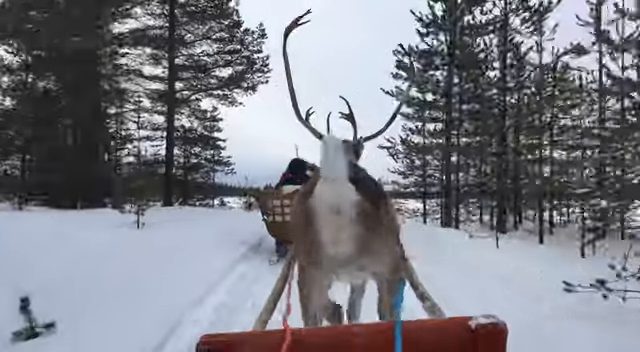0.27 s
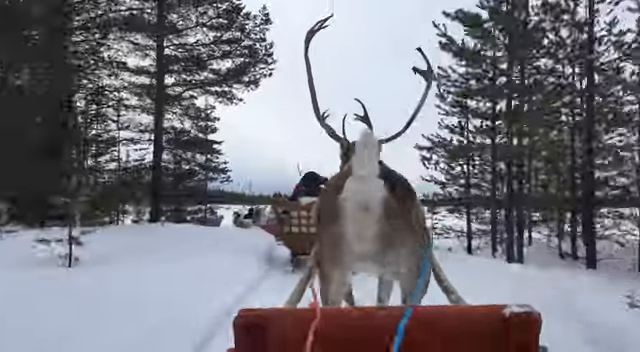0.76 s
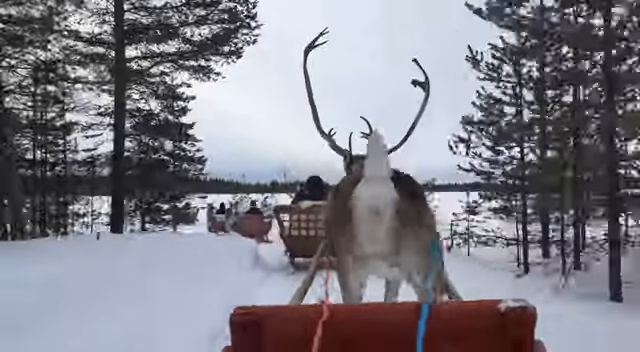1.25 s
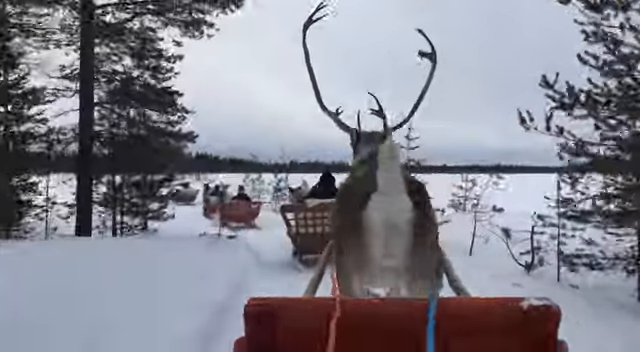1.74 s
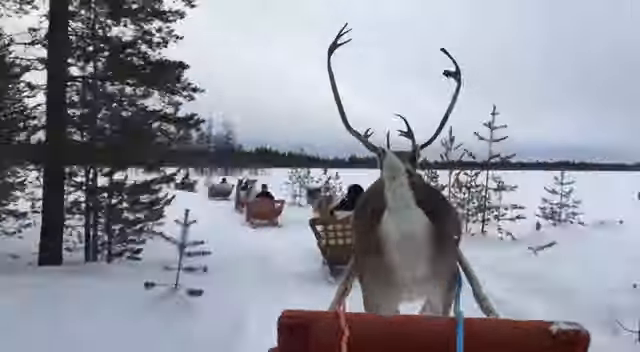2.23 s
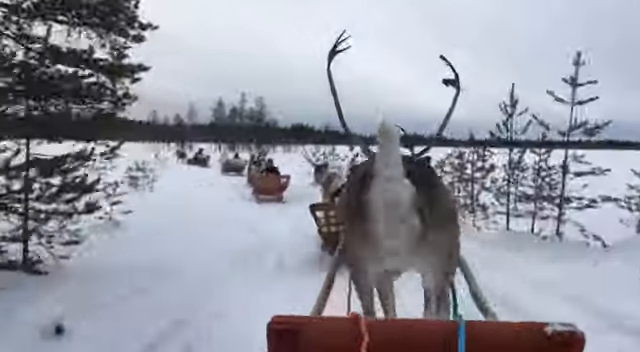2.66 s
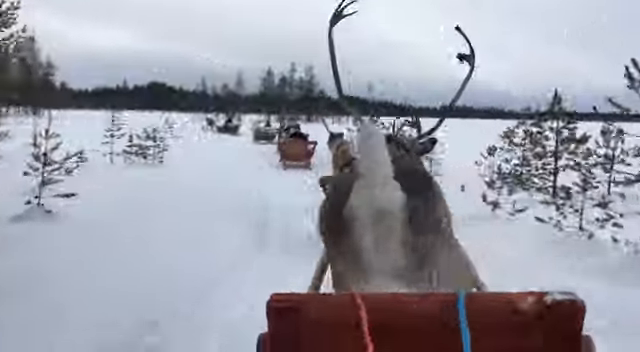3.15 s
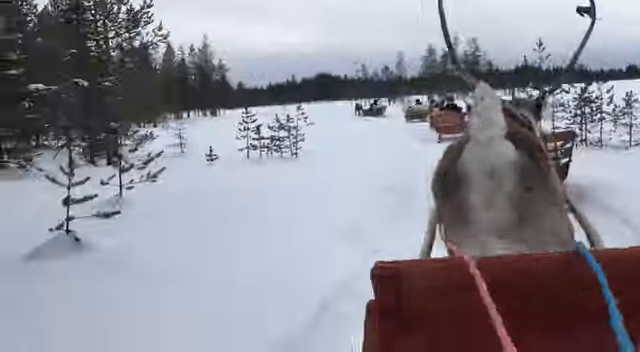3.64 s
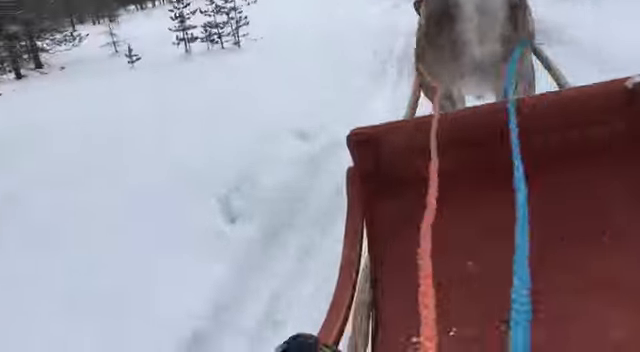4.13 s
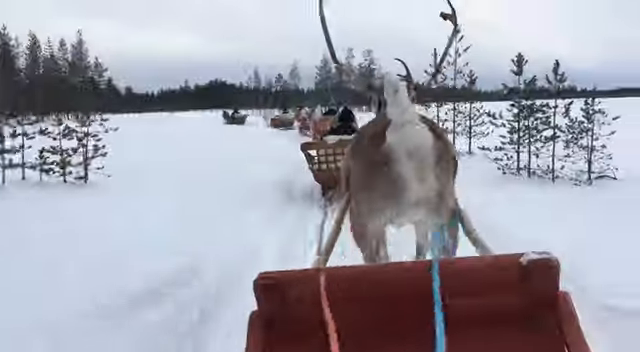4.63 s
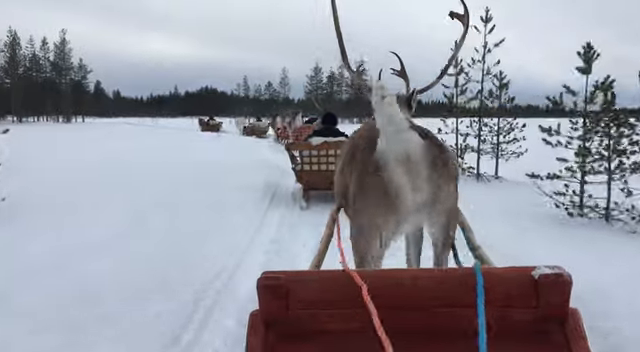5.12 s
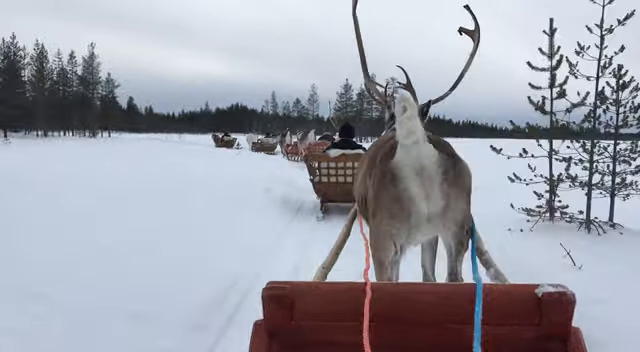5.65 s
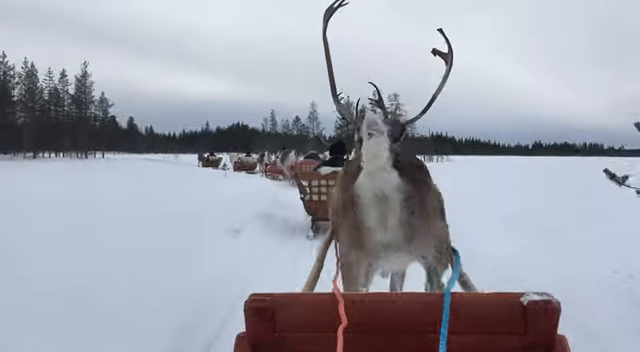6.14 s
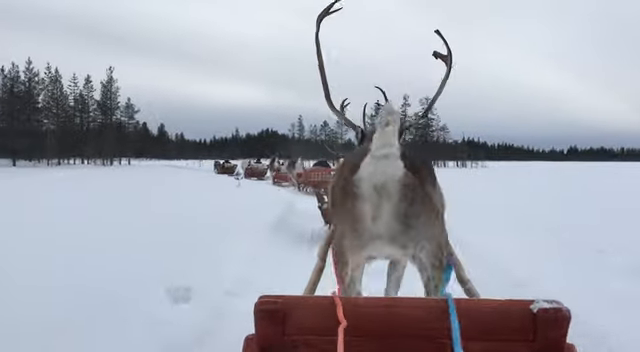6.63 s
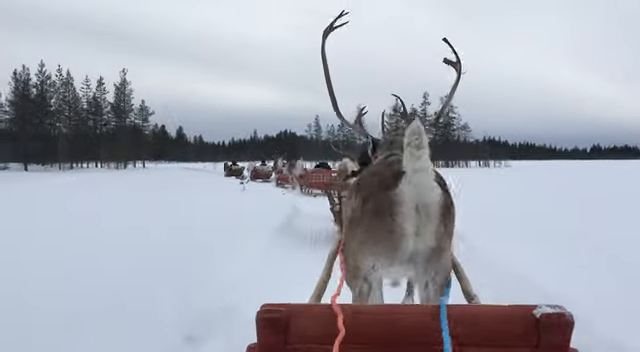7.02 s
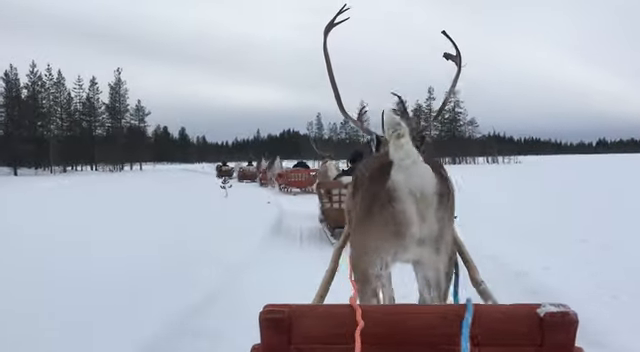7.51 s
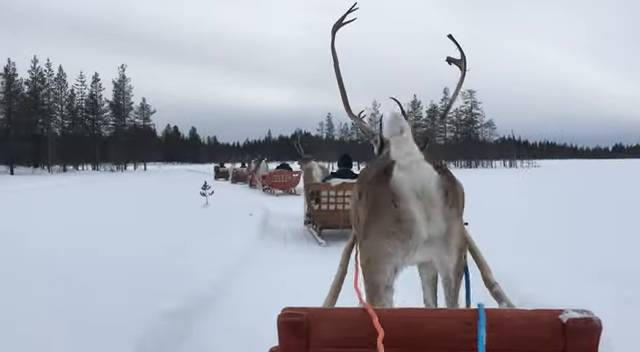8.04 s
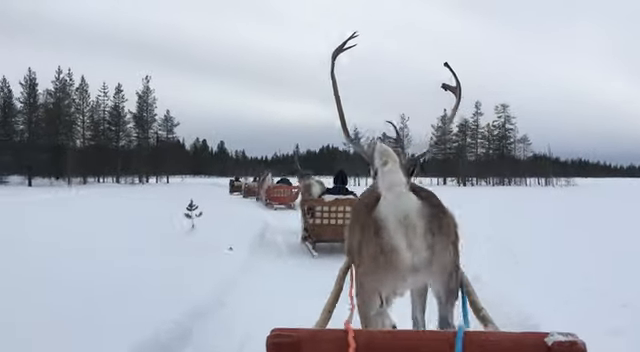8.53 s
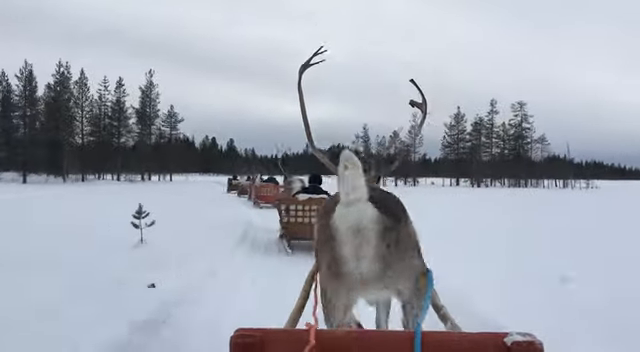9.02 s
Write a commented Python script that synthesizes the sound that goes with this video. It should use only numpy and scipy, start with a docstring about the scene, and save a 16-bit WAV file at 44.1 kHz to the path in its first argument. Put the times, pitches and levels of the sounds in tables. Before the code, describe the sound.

Low, uneven rumble of a reindeer sleigh gliding on snow, dotted with wooden knocks, harness ticks and brief crunches.

```python
"""A reindeer sleigh on packed snow.

Heard from the seat: friction at the runners drives the hollow wooden body into a rumble that swells over
hummocks. Impacts excite damped modes: ruts and, later, footfalls thump the body, the shafts knock in their
joints, fittings tick and a harness ring jingles. Crust crunches as it fractures, and dull blows disperse into
thuds. Stick-slip gives a groan and, after one jolt, a shrill scrape. There are a few squeaks and a very brief
high whistle. Under it all lie a thin hiss and faint bursts of snow kicked up by the hooves."""
import sys
import numpy as np
from scipy import signal
from scipy.fft import rfft, irfft, next_fast_len
from scipy.io import wavfile
from scipy.ndimage import uniform_filter1d, map_coordinates

SR = 44100
rng = np.random.default_rng(int(sys.argv[2]) if len(sys.argv) > 2 else 0)


def persist_wave(psi):
    """Save psi, clipped to +-1, as 16-bit WAV."""
    counts = np.round(np.clip(psi, -1, 1) * 32767).astype(np.int16)
    wavfile.write(sys.argv[1], SR, np.atleast_2d(counts).T)


N = 408807

# the snow under the runners: time_s, friction_db, hiss_db
SNOW_LEVELS = [(0.0, -44.5, -56.5), (0.33, -41.5, -54), (0.85, -50, -55), (2.45, -49, -52.5),
               (2.66, -42.5, -50.5), (2.91, -44.5, -56.5), (3.12, -42, -48.5), (4.0, -48, -51.5),
               (4.46, -47, -54.5), (4.65, -50, -53.5), (5.55, -46, -53.5), (5.99, -52.5, -53.5),
               (6.38, -45, -57), (6.53, -51, -54.5), (8.72, -48.5, -54.5), (9.27, -48.5, -53.5)]
# spectrum of a thin hiss: frequency_hz, level_db
HISS_SPECTRUM = [(1500, 4), (3600, 3), (4800, -4), (5300, -1.5), (6300, 1.5), (7800, -4.5), (9400, -0.5),
                 (10500, -3), (12600, 5.5), (14000, 0.5), (16000, 1)]


def amp(db):
    """Decibels to amplitude gain."""
    return 10 ** (np.asarray(db) / 20)


def unit(x):
    """x scaled to rms 1."""
    return x / np.sqrt(np.mean(x ** 2) + 1e-20)


def curves(rows):
    """Linear interpolation: one value per sample for each column after the time."""
    times, *columns = np.transpose(rows)
    return [np.interp(np.arange(N) / SR, times, column) for column in columns]


def wobble(rate_hz):
    """Random modulation: a smooth curve through rate_hz Gaussian knots a second."""
    knots = rng.standard_normal(int(N * rate_hz / SR) + 4)
    return map_coordinates(knots, [np.arange(N) * rate_hz / SR])


def noise(samples=N):
    """White Gaussian noise."""
    return rng.standard_normal(samples)


def grains(rate_hz, spread_db):
    """Shot noise: tiny fractures at random times and of uneven size, at rms 1."""
    impulses = (rng.random(N) < rate_hz / SR) * np.sign(noise())
    return unit(impulses * amp(spread_db * np.clip(noise(), -2, 2)))


def filtered(x, response):
    """Linear filtering: the spectrum of x times a response of frequency."""
    size = next_fast_len(len(x) + 8192)
    return irfft(rfft(x, size) * response(np.fft.rfftfreq(size, 1 / SR)), size)[:len(x)]


def coloured(x, spectrum):
    """Spectral shaping of x by (frequency_hz, level_db) points, at rms 1."""
    points_hz, db = np.transpose(spectrum)
    return unit(filtered(x, lambda hz: amp(np.interp(np.log(hz + 1), np.log(points_hz), db))))


def resonant(x, modes):
    """Forced vibration: x drives (frequency_hz, bandwidth_hz, gain_db) resonators, at rms 1."""
    def response(f):
        return sum(amp(db) * 1j * f * width / (hz * hz - f * f + 1j * f * width)
                   for hz, width, db in modes)
    return unit(filtered(x, response))


def ring(modes, t, scatter_db):
    """Free vibration: (frequency_hz, level_db, t60_s) modes decay from random strengths and phases."""
    hz, db, t60 = np.transpose(modes)[:, :, None]
    level = db + scatter_db * rng.standard_normal(hz.shape) - 60 * t / t60
    return np.sum(amp(level) * np.sin(2 * np.pi * (hz * t + rng.random(hz.shape))), axis=0)


def emphasis(hz, note_hz, gain_db, octaves):
    """Decibels that a broad resonance adds around its note."""
    return gain_db * np.exp(-(np.log2(hz / note_hz) / octaves) ** 2)


def burst(length_s, rise_s):
    """A transient force: exponential rise, Gaussian fade."""
    t = np.arange(SR // 3) / SR
    return (1 - np.exp(-t / rise_s)) * np.exp(-(t / length_s) ** 2)


def add(track, start_s, db, sound):
    """Superposition: add a sound to the track at start_s with a gain of db."""
    part = track[max(round(start_s * SR), 0):][:len(sound)]
    part += amp(db) * sound[:len(part)]


def hummocks():
    """Amplitude modulation by load: the gains of rumble and shudder swell to each crest and ebb."""
    # hummocks under the runners: crest_s, half_length_s, rumble_db, shudder_db
    crests = [(0.091, 0.035, -26.5, -24.5), (0.418, 0.061, -20.5, -22.5), (0.616, 0.02, -18, -16.5),
              (0.844, 0.053, -15.5, -34), (1.31, 0.075, -23, -23), (2.296, 0.041, -36, -24),
              (2.527, 0.036, -25.5, -27), (2.945, 0.032, -20.5, -37), (3.097, 0.086, -24, -45),
              (3.275, 0.042, -15, -19), (3.397, 0.082, -25.5, -45), (3.697, 0.094, -19.5, -28),
              (4.264, 0.031, -25, -49), (4.494, 0.12, -17.5, -30), (5.582, 0.045, -25.5, -46),
              (6.327, 0.025, -24, -53), (6.826, 0.022, -31, -28), (7.344, 0.055, -26, -46),
              (7.74, 0.05, -26, -52), (7.917, 0.04, -23, -31.5), (8.462, 0.028, -23.5, -42),
              (8.599, 0.03, -21.5, -28), (8.69, 0.035, -22, -44), (8.936, 0.018, -17, -31)]
    t, heave, sway = np.arange(N) / SR, np.zeros(N), np.zeros(N)
    for crest, half, rumble_db, shudder_db in crests:
        load = np.exp(-((t - crest) / half) ** 2)
        heave += amp(rumble_db) * load
        sway += amp(shudder_db) * load
    return heave, sway


def runners(body_gain_db=0.53, deep_gain_db=3.0, friction_gain_db=-0.5, lumps_db=2.5, grip_db=3.5):
    """Forced vibration: drag, hummocks and lumps shake the body as snow grains break under it."""
    # the steady drag of the runners: time_s, rumble_db, shudder_db
    drag = [(0.0, -29, -46), (0.2, -27.5, -41), (0.75, -28.5, -35.5), (1.11, -38, -47), (1.47, -30.5, -31),
            (2.43, -38, -39.5), (2.68, -28.5, -31), (2.97, -32.5, -42), (5.0, -30.5, -42.5),
            (6.48, -31, -45.5), (7.0, -35.5, -35.5), (7.69, -34, -44.5), (8.05, -34.5, -37),
            (8.83, -33.5, -46), (9.27, -27.5, -36)]
    # spectrum of the rumbling body: frequency_hz, level_db
    rumble_spectrum = [(60, -60), (105, -7), (140, -2.5), (175, 0), (225, -6.5), (275, -9), (310, -13.5),
                       (380, -10), (445, -25), (600, -45), (1500, -73)]
    # spectrum of the body under heavy load, mostly its lowest mode: frequency_hz, level_db
    loaded_spectrum = [(60, -45), (105, -12), (145, 0), (180, -1.5), (225, -8.5), (340, -14.5),
                       (450, -30.5), (1200, -65)]
    # spectrum of the deep shudder: frequency_hz, level_db
    shudder_spectrum = [(15, -58), (27, -37), (42, -11.5), (60, -6), (80, -9.5), (110, -10.5), (200, -53),
                        (500, -85)]
    # spectrum of friction on snow: frequency_hz, level_db
    friction_spectrum = [(200, -4.5), (450, 1.5), (680, 7), (900, 0), (1300, -5), (1700, -7), (2500, -13.5),
                         (3700, -20), (4700, -35), (9000, -19.5), (16000, -39)]
    # timber resonances that colour the friction: frequency_hz, bandwidth_hz, gain_db
    timber_modes = [(596, 140, -1), (906, 58, 4), (1054, 90, -2), (1326, 34, 3.5), (1680, 44, -14),
                    (2280, 120, -8), (2490, 280, -8)]
    body_db, deep_db = curves(drag)
    friction_db, _ = curves(SNOW_LEVELS)
    heave, sway = hummocks()
    lumps = wobble(28)
    body_force = amp(body_db + body_gain_db + lumps_db * lumps)
    deep_force = amp(deep_db + deep_gain_db + lumps_db * lumps)
    rumble = body_force * coloured(grains(600, spread_db=1.5), rumble_spectrum)
    boom = heave * coloured(grains(600, spread_db=2.0), loaded_spectrum)
    shudder = np.hypot(deep_force, sway) * coloured(noise(), shudder_spectrum)  # powers add
    snow = coloured(grains(3000, spread_db=1.5), friction_spectrum)
    timber = 0.35 * resonant(grains(1500, spread_db=8.0), timber_modes)
    grip = 0.5 * (lumps + wobble(12) + wobble(70))  # the snow holds unevenly at several rates
    friction = amp(friction_db + friction_gain_db + grip_db * grip) * (snow + timber)
    return rumble + boom + shudder + friction


def hiss(gain_db=3.5, flutter_db=1.8, patchiness_db=3.0):
    """Modulated noise: a thin, dry hiss, gently patchy in time and frequency, swelling in loose snow."""
    _, hiss_db = curves(SNOW_LEVELS)
    spectra = signal.stft(noise(), nperseg=512)[2]
    patches = uniform_filter1d(rng.standard_normal(spectra.shape), size=5, axis=0)
    patches = uniform_filter1d(patches, size=5, axis=1)
    fizz = signal.istft(spectra * amp(patchiness_db * unit(patches)), nperseg=512)[1][:N]
    return amp(hiss_db + gain_db + flutter_db * wobble(18)) * coloured(fizz, HISS_SPECTRUM)


def hooves(level_db=-47.0, step_s=0.145, t60_s=0.12, rise_s=0.0047, uneven_db=4):
    """Decaying shot noise: trotting hooves kick up faint, crisp bursts of snow at an uneven pace."""
    # spectrum of kicked snow: frequency_hz, level_db
    kicked_spectrum = [(500, -8), (2500, 0), (6000, 6), (9000, 11), (16000, 3)]
    force, t = np.zeros(N), np.arange(SR // 6) / SR
    kick = (1 - np.exp(-t / rise_s)) * amp(-60 * t / t60_s)
    for step, (late, size) in enumerate(rng.uniform(-1.19, 1, (int(N / SR / step_s), 2))):
        add(force, (step + 0.5 + 0.5 * late) * step_s, level_db + uneven_db * size, kick)
    return force * coloured(grains(2000, spread_db=6.0), kicked_spectrum)


def bumps(gain_db=-1.0, rise_s=0.0025, lag_s=0.00094):
    """Impulse response: each rut or footfall sets the low modes of the hollow body ringing in a soft thump."""
    # jolts from ruts and, later, from the reindeer's footfalls: start_s, level_db, pitch_hz
    ruts = [(0.072, -14.5, 101), (0.376, -6, 142.2), (0.582, -14, 133.4), (0.62, -15, 63),
            (0.805, -12, 147), (0.874, -10, 97), (0.916, -10, 124), (0.964, -14, 88.4), (1.282, -20, 121),
            (1.355, -18, 155), (1.957, -9, 143), (2.144, -17, 169.4), (2.571, -10, 121), (2.603, -9, 152),
            (2.943, -17.5, 154), (3.112, -12, 176), (3.23, -3, 153), (3.271, -10, 155), (3.67, -12, 132),
            (3.727, -10.5, 149), (4.348, -11.5, 140), (4.411, -8, 176.6), (4.432, -8, 137),
            (4.472, -6.5, 131), (4.529, -7.5, 140), (4.639, -11.5, 130), (5.138, -20.5, 183),
            (5.7994, -8.5, 140), (6.031, -12, 142), (6.583, -27, 173), (6.682, -25, 204),
            (7.436, -14.5, 175), (7.562, -22.5, 182.5), (8.012, -13.5, 174.4), (8.372, -20, 150),
            (8.441, -12.5, 170), (8.581, -21.5, 158), (9.083, -20.5, 157)]
    # modes of the hollow body: frequency_ratio, level_db, t60_s
    body_modes = [(1.001, 3, 0.12), (1.36, -11, 0.17), (2.049, -7, 0.11), (2.55, -22.5, 0.077)]
    out, t = np.zeros(N), np.arange(SR // 4) / SR
    for start, db, hz in ruts:
        modes = [(hz * ratio, level, t60) for ratio, level, t60 in body_modes]
        thump = ring(modes, t, scatter_db=3.5) * (1 - np.exp(-t / rise_s))
        add(out, start + lag_s, db + gain_db, thump)
    return out


def knocks(gain_db=-9, build_cycles=0.59, rebound_s=0.005045, rebound_db=-4,
           contact_gain=0.75, contact_rise_s=0.00053, contact_t60_s=0.08):
    """Impact with one rebound: wood clacks on wood while the frame's modes build to a hollow note."""
    # the shafts knock in their joints: start_s, level_db, tilt_db_per_octave, joint_note_hz
    impacts = [(0.078, -26.5, -5.5, 513), (0.373, -23.5, 7, 1310), (0.587, -21, -2, 690),
               (0.801, -13, 0.5, 1270), (0.876, -27, -7.5, 480), (0.914, -31, -9.5, 466),
               (1.288, -32, -8.5, 700), (1.357, -21, -6, 1160), (1.952, -10, -1.5, 970),
               (2.155, -36, -6, 400), (2.572, -21.5, -4, 1120), (3.428, -26.5, 0, 970),
               (4.391, -23.5, -4, 1190), (4.468, -23.5, -7, 1200), (4.473, -21.5, -4, 790),
               (4.521, -23.5, -4, 1200), (5.797, -14.5, -2.5, 1060), (6.017, -21, -4, 730),
               (6.819, -33, 4, 1400), (8.916, -34, 2, 1000)]
    # modes of the wooden frame: frequency_hz, level_db, t60_s
    frame_modes = [(342.4, 5, 0.093), (411, -3.5, 0.15), (508, -8.5, 0.087), (585, 0, 0.068),
                   (685, 2, 0.063), (848, -8.5, 0.12), (1000, -2, 0.037), (1150, -3.5, 0.04),
                   (1280, -8.5, 0.043), (1357, -18.5, 0.06), (1610, -10, 0.068), (1884, -18, 0.065),
                   (2160, -21.5, 0.077), (2330, -14.5, 0.06), (2840, -17, 0.03)]
    # spectrum of wood pressing on wood: frequency_hz, level_db
    contact_spectrum = [(70, -47), (250, -15), (450, -12), (1300, 2.5), (1900, -10), (3000, -13.5),
                        (4500, -29), (9000, -33)]
    out, t = np.zeros(N), np.arange(SR // 8) / SR
    pressure = contact_gain * amp(-60 * t / contact_t60_s) * (1 - np.exp(-t / contact_rise_s))
    for start, db, tilt, note in impacts:
        def joint_db(hz):
            return tilt * np.log2(hz / 1000) + emphasis(hz, note, gain_db=6, octaves=0.26)
        clack_spectrum = [(hz, level + joint_db(hz)) for hz, level in contact_spectrum]
        detune = 1 + 0.03 * rng.standard_normal()  # the load on the joint shifts its note
        for delay, drop_db in [(0, 0), (rebound_s, rebound_db)]:
            wood = np.zeros(len(t))
            for hz, level, t60 in frame_modes:
                mode = ring([(hz * detune, level + joint_db(hz), t60)], t, scatter_db=2.5)
                wood += mode * (1 - np.exp(-t * hz / build_cycles))
            clack = pressure * coloured(noise(len(t)), clack_spectrum)
            add(out, start + delay, db + gain_db + drop_db, wood + clack)
    return out


def groan(start_s=0.173, end_s=0.4, fade_s=0.012, pitch_hz=168, level_db=-19, waver=0.024):
    """Stick-slip oscillation: a runner grips and slides in step with the body's lowest mode."""
    t = np.arange(N) / SR
    swell = np.clip(np.minimum(t - start_s, end_s - t) / fade_s, 0, 1)
    envelope = amp(level_db + wobble(31)) * swell
    pitch = pitch_hz * (1 + waver * wobble(27.2))
    return envelope * np.sin(2 * np.pi * np.cumsum(pitch) / SR)


def crunches(gain_db=2, rise_s=0.0014):
    """Brittle fracture: crust gives way in a quick burst of grains that makes the timber creak."""
    # the runners break through crust: start_s, level_db, length_s, snow_fraction
    breaks = [(0.332, -28.5, 0.025, 0.46), (0.369, -40, 0.04, 0), (0.887, -41, 0.042, 0.45),
              (3.039, -37, 0.14, 0.52), (3.108, -36.5, 0.043, 0.33), (3.231, -19.5, 0.019, 0.9),
              (3.246, -24.5, 0.034, 0.5), (3.433, -37.5, 0.03, 0.2), (3.579, -34.5, 0.057, 0.42),
              (3.657, -36.5, 0.05, 0.37), (4.385, -31, 0.04, 0.4), (4.49, -41, 0.039, 0.14),
              (4.813, -42.5, 0.12, 0.3), (6.238, -47, 0.093, 0.43), (6.474, -47.5, 0.041, 0.36),
              (7.218, -40, .018, 0.45), (7.682, -43.5, 0.037, 0.53), (7.995, -42, 0.041, 0.3),
              (8.665, -48, 0.023, 0.4)]
    # spectrum of breaking crust: frequency_hz, level_db
    crust_spectrum = [(200, -29), (500, 8), (1200, 3), (1800, 4), (2500, 5), (3300, -7.5), (4300, -4.5),
                      (5800, -18), (9000, -17.5), (16000, -25)]
    # resonances of the creaking timber: frequency_hz, bandwidth_hz, gain_db
    creak_modes = [(828, 89, 17.5), (1084, 58, 17.5), (1290, 27, 12), (1645, 38, 12), (2140, 41, -5),
                   (2350, 51, 2), (5380, 240, -4.5)]
    on_snow, on_timber = np.zeros(N), np.zeros(N)
    for start, db, length, snow_fraction in breaks:
        force = burst(length, rise_s)
        add(on_snow, start, db + gain_db, snow_fraction * force)
        add(on_timber, start, db + gain_db, (1 - snow_fraction) * force)
    crust = on_snow * coloured(grains(2500, spread_db=5.0), crust_spectrum)
    creak = on_timber * resonant(grains(900, spread_db=2.0), creak_modes)
    return crust + creak


def squeaks(waver=0.0225, roughness=0.4):
    """Modulated tones: three rough squeaks of a fitting, and a very brief, high, wavering whistle."""
    # short tones, the highest being the whistle: middle_s, half_length_s, pitch_hz, level_db
    tones = [(0.347, 0.016, 3150, -39), (2.025, 0.01, 3130, -28), (4.392, .01, 9760, -40),
             (4.403, 0.015, 2470, -35)]
    t, out = np.arange(N) / SR, np.zeros(N)
    warped_time = np.cumsum(1 + waver * wobble(400)) / SR
    for middle, half, hz, db in tones:
        envelope = amp(db) * np.exp(-((t - middle) / half) ** 2)
        out += envelope * np.sin(2 * np.pi * hz * warped_time)
    return out * (1 + roughness * wobble(250))


def ticks(gain_db=-8, snap_t60_s=0.029, ring_db=-10, ring_t60_s=0.045, ring_width_hz=250):
    """Hard contact: a broadband snap centres on the resonance of each fitting, which rings briefly."""
    # harness fittings strike: start_s, level_db, note_hz
    contacts = [(0.599, -20, 9600), (0.725, -28.5, 6160), (0.8, -24, 6240), (1.109, -31.5, 6000),
                (1.3423, -21, 12300), (1.908, -27.5, 12000), (1.955, -19, 13000), (2.602, -20.5, 11300),
                (2.8596, -26.5, 7350), (2.919, -18, 11000), (3.239, -15, 4450), (3.5534, -23.5, 5460),
                (3.566, -24.5, 9000), (4.481, -25, 13000), (5.1376, -29, 12000), (6.581, -32.5, 6000),
                (7.341, -32, 2300), (7.948, -29.5, 5600), (9.1134, -29, 11900)]
    # spectrum of a tick: frequency_hz, level_db
    snap_spectrum = [(600, -6), (2500, 9.5), (4500, 3.5), (6200, 6), (8000, 1), (11000, 0), (16000, 4.5)]
    out, t = np.zeros(N), np.arange(SR // 12) / SR
    for start, db, note in contacts:
        snap = coloured(noise(len(t)), snap_spectrum)
        snap = unit(filtered(snap, lambda hz: amp(emphasis(hz + 1, note, gain_db=8, octaves=0.93))))
        tone = resonant(noise(len(t)), [(note, ring_width_hz, 0)])
        tick = snap * amp(-60 * t / snap_t60_s) + tone * amp(ring_db - 60 * t / ring_t60_s)
        add(out, start, db + gain_db, tick)
    return out


def thuds(low_hz=62, rise_s=0.0023, scatter_t60_s=0.032):
    """Dispersion: high bending waves outrun low ones in the timbers, so a knock sinks into a thud."""
    # dull blows from below: start_s, level_db, starting_pitch_hz, fall_time_s
    blows = [(1.463, -18.5, 593, 0.0077), (1.598, -22.5, 750, 0.0071), (2.489, -20.5, 750, 0.0062),
             (1.958, -9, 517, 0.0109), (2.749, -10, 580, 0.0048), (5.802, -9, 520, 0.0088),
             (6.587, -14.5, 233, 0.025), (6.785, -15, 624, 0.0079), (6.934, -19.5, 450, 0.0084),
             (7.003, -19.5, 315, .013), (8.277, -13, 300, 0.0056), (8.92, -14, 383, 0.01)]
    out, t = np.zeros(N), np.arange(SR // 6) / SR
    for start, db, hz, fall in blows:
        pitch = low_hz + (hz - low_hz) * np.exp(-t / fall)
        wave = burst(3.2 * fall, rise_s)[:len(t)] * np.sin(2 * np.pi * np.cumsum(pitch) / SR)
        scatter = noise(len(t)) * amp(-60 * t / scatter_t60_s)  # waves scatter at the joints
        echoes = signal.fftconvolve(wave, scatter)[:len(t)]
        add(out, start, db, 0.5 * (wave + np.std(wave) * unit(echoes)))
    return out


def scrape(gain_db=-4.0, rasp_gain=0.8, waver=0.012):
    """Friction drives resonance: a fitting slips after a hard jolt and rings, shrill and wavering."""
    # envelope of the scrape: time_s, level_db
    envelope = [(1.970, -110), (1.974, -54), (1.983, -24.5), (2.000, -26.5), (2.010, -26.5), (2.028, -26.5),
                (2.037, -38), (2.048, -51), (2.075, -110)]
    # resonances of the sliding fitting: frequency_hz, bandwidth_hz, gain_db
    fitting_modes = [(3230, 230, 0), (3960, 460, -3), (5320, 250, 4), (5740, 170, 4), (7400, 180, 5),
                     (8460, 110, 5), (9000, 140, 1), (9450, 150, -2), (12900, 520, 2), (14700, 550, -2),
                     (15800, 220, 6)]
    level_db, = curves(envelope)
    warped_samples = np.cumsum(1 + waver * wobble(60))
    ringing = resonant(grains(5000, spread_db=5.0), fitting_modes)
    shrill = map_coordinates(ringing, [warped_samples], order=3)
    rasp = rasp_gain * coloured(noise(), HISS_SPECTRUM)
    return amp(level_db + gain_db) * (shrill + rasp)


def chinks(gain_db=-1, length_s=0.044, rise_s=0.0042):
    """Repeated impacts: a small metal ring chatters against its strap and its modes sing faintly."""
    # the harness ring jingles: start_s, level_db
    jingles = [(2.44, -53), (2.52, -54), (7.45, -53), (7.645, -55), (7.72, -53.5), (8.34, -50)]
    # resonances of the ring: frequency_hz, bandwidth_hz, gain_db
    metal_modes = [(3680, 31, 7), (7270, 110, -6)]
    force = np.zeros(N)
    for start, db in jingles:
        add(force, start, db + gain_db, burst(length_s, rise_s))
    return force * resonant(grains(500, spread_db=3.0), metal_modes)


def scene():
    """Free field: open snow gives no echo, so the sources add dry in one channel."""
    sleigh = runners() + groan() + bumps() + thuds() + knocks() + crunches() + scrape() + squeaks()
    return (sleigh + hiss() + hooves() + ticks() + chinks())[None]


def record(dry, ceiling=0.72, cutoff_hz=15850):
    """Soft saturation rounds off the loudest peaks, and a low-pass filter limits the band."""
    rounded = dry[0] / (1 + np.abs(dry[0] / ceiling) ** 6) ** (1 / 6)
    return filtered(rounded, lambda hz: hz < cutoff_hz)[None]


dry = scene()
out = record(dry)
persist_wave(out)
```